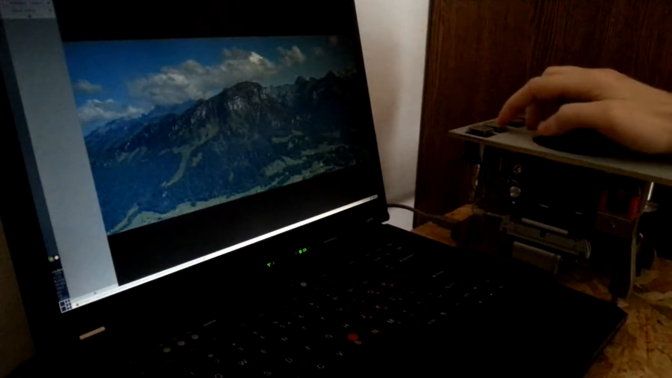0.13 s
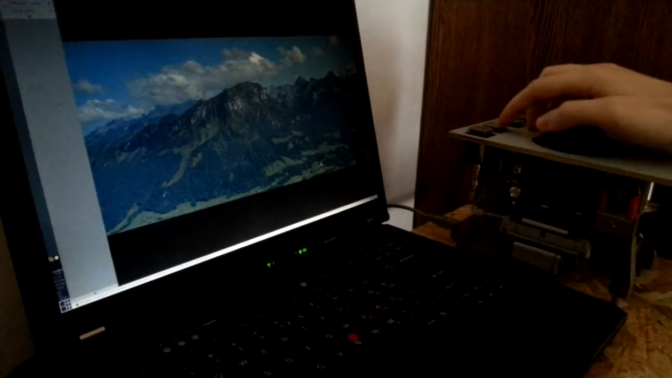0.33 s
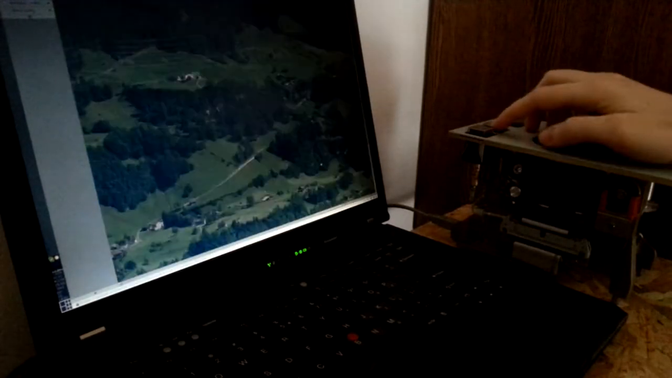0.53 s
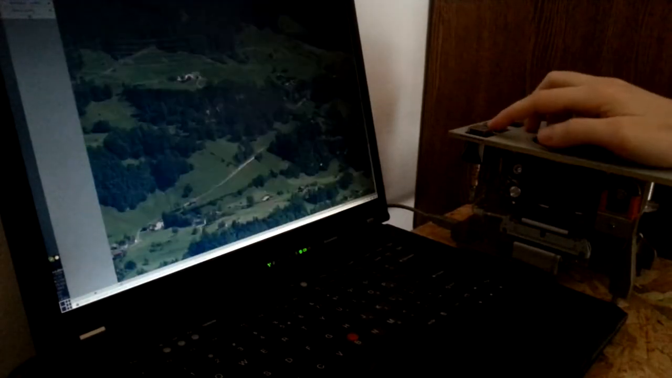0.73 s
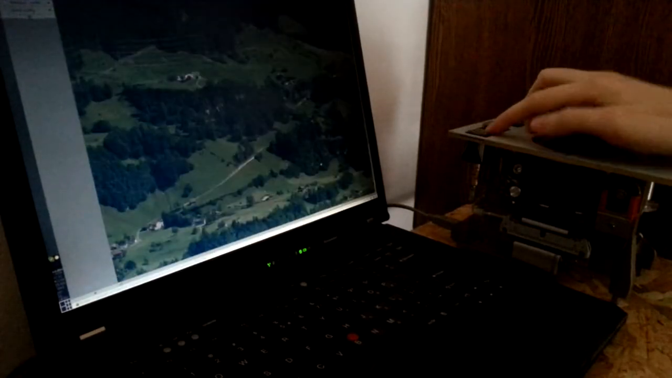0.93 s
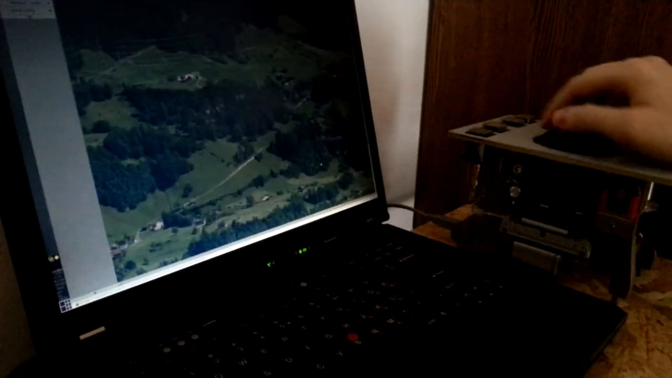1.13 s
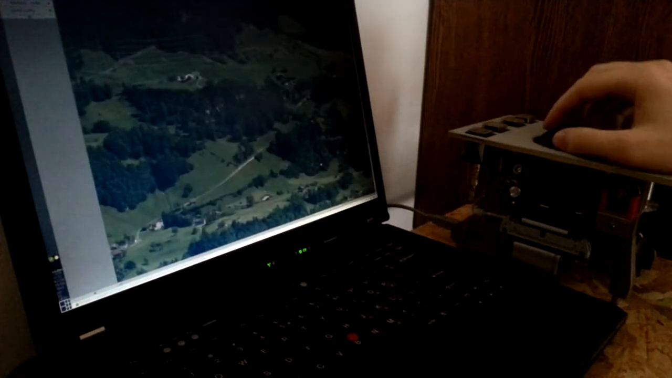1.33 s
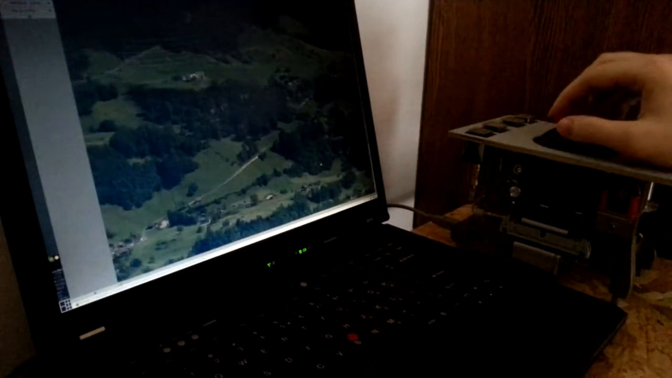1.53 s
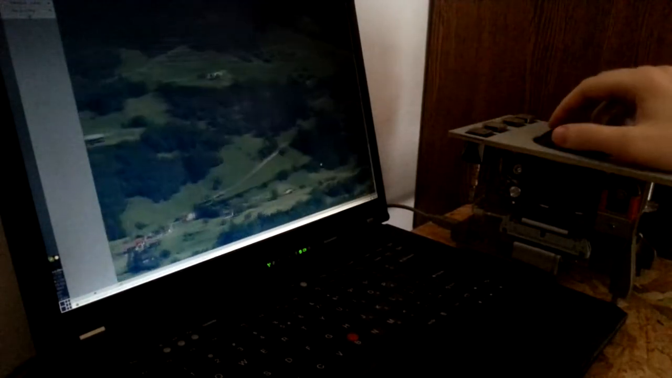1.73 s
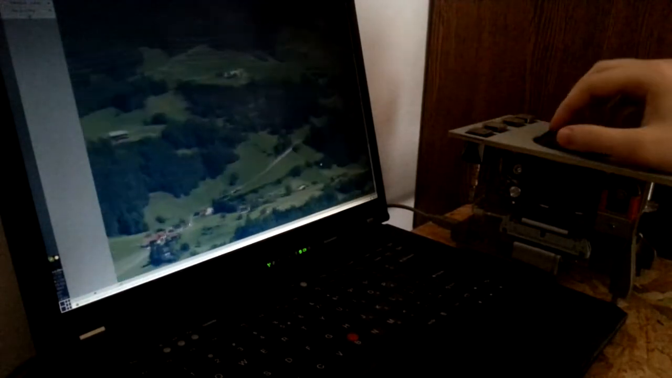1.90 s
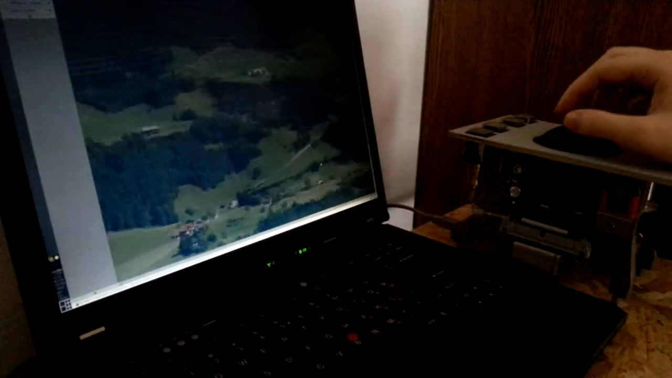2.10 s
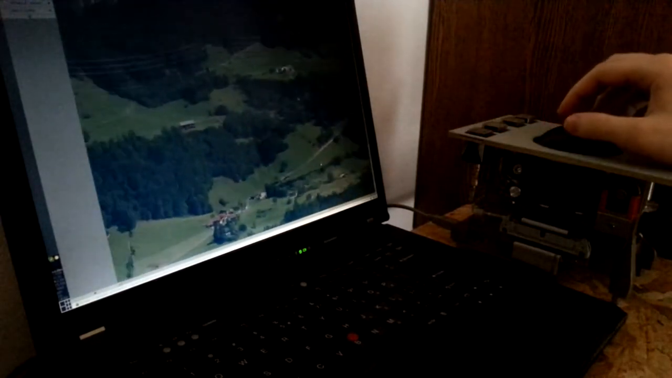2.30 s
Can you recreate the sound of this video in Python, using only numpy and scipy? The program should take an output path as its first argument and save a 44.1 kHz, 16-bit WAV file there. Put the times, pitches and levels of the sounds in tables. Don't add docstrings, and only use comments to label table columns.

```python
import sys
import numpy as np
from scipy import signal
from scipy.fft import rfft, irfft
from scipy.io import wavfile
from scipy.ndimage import uniform_filter1d, map_coordinates

SR = 44100
rng = np.random.default_rng(int(sys.argv[2]) if len(sys.argv) > 2 else 0)


def how_loud(loudness_db):
    steps = np.asarray(loudness_db, float) / 20
    return 10 ** steps


def master(y):
    cut = np.clip(np.atleast_2d(y).T, -1, 1)
    pcm = np.round(cut * 32767)
    wavfile.write(sys.argv[1], SR, pcm.astype(np.int16))


N = 101430

# (frequency [Hz], level when struck [dB], level when rolled [dB], t60 [s])
PANEL_MODES = [(150.4, -14, -0.5, 0.28), (189.9, -5.5, 2, 0.2), (218.6, -11, -6.5, 0.15),
               (311.5, 10, 2, 0.06), (343.7, 10.5, 2, 0.066), (413, 4, -11, 0.1), (463, 3.5, -10, 0.027),
               (478.9, -4.5, -19.5, 0.75), (544, 7, -14, 0.04), (629, 0.5, -32.5, 0.15),
               (678.5, 5, -17.5, 0.057), (818, 11, -51, 0.023), (1232, 0, -14.5, 0.04),
               (1395, 6, -18, 0.074)]


def unit(x):
    return x / np.sqrt(np.mean(x ** 2))


def peak(x):
    return x / np.abs(x).max()


def band(x, hz, width_hz):
    return signal.lfilter(*signal.iirpeak(hz, hz / width_hz, SR), x)


def band_twice(x, hz, width_hz):
    return band(band(x, hz, width_hz), hz, width_hz)


def ring(x, hz, t60):
    pole = np.exp(2j * np.pi * hz / SR - np.log(1000) / (max(t60, 1e-3) * SR))
    return signal.lfilter([1], [1, -pole], x).imag


def panel(force, level_column, split_hz):
    low, high = np.zeros((2, len(force)))
    for k, mode in enumerate(PANEL_MODES):
        hz, t60 = mode[0], mode[3]
        tone = (-1) ** k * how_loud(mode[level_column]) * ring(force, hz, t60)
        if hz < split_hz:
            low += tone
        else:
            high += tone
    return low, high


def walk(rate):
    k = int(SR / rate)
    steps = np.repeat(rng.standard_normal(N // k + 1), k)
    return unit(uniform_filter1d(uniform_filter1d(steps, k), k)[:N])


def hiss():
    # (frequency [Hz], density [dB per Hz])
    floor = [(25, -23), (60, -10), (110, -5.5), (580, -9.5), (830, -11), (1500, -13.5), (5140, -19),
             (15500, -20)]
    # (frequency [Hz], width [Hz], level [dB])
    fan = [(5200, 1060, -54), (7330, 16, -64), (180, 46, -73.5), (507, 73, -59.5)]
    floor_db, alike_below_hz = -47, 370
    f = np.arange(N // 2 + 1) * SR / N + 1
    hz, db = np.array(floor).T
    mid, side = rfft(rng.standard_normal((2, N))) * how_loud(np.interp(np.log(f), np.log(hz), db))
    side = side * f / (f + alike_below_hz)
    out = unit(irfft(np.array([mid + side, mid - side]), N)) * how_loud(floor_db)
    air = rng.standard_normal(N) + 1.8 * rng.standard_normal((2, N))
    for hz, width_hz, db in fan:
        out = out + how_loud(db) * unit(band(air, hz, width_hz))
    return out


def earlier_spin():
    hz, level_db, t60_s = 184.3, -27.5, 0.088
    t = np.arange(N) / SR
    return how_loud(level_db) * np.sin(2 * np.pi * hz * t) * how_loud(-60 * t / t60_s)


def steady(x):
    flywheel_s = 0.17
    return x / np.sqrt(uniform_filter1d(x ** 2, int(flywheel_s * SR)))


def rolling():
    # (time [s], level [dB])
    speed_curve = [(0, -34), (.035, -60), (.05, -57.5), (1.28, -67.5), (1.372, -39), (1.388, -43.5),
                   (1.42, -35), (1.5, -39.5), (1.62, -39.5), (1.655, -43.5), (1.69, -43), (1.86, -55),
                   (1.888, -37), (1.92, -35), (2.07, -31), (2.11, -34), (2.2, -36.5), (2.3, -36.5)]
    bumps_per_s, bump_spread_db = 900, 2
    boom_top_hz, boom_db = 260, 1.5
    grit_hz, grit_width_hz, grit_db = 1370, 1130, -19
    lurch_db, lurch_per_s = -1, 30
    t = np.arange(N) / SR
    chance = rng.random((2, N))
    size = how_loud(-bump_spread_db * np.log(chance[1] + 1e-9))
    bumps = (chance[0] < bumps_per_s / SR) * size * rng.standard_normal(N)
    boom, hum = panel(bumps, 2, boom_top_hz)
    rumble = how_loud(boom_db) * steady(boom) + steady(hum)
    grit = steady(band_twice(bumps, grit_hz, grit_width_hz))
    speed = how_loud(np.interp(t, *np.array(speed_curve).T) + lurch_db * walk(lurch_per_s))
    return speed * (rumble + how_loud(grit_db) * grit)


def skin():
    slip_s = [
        1.27,
        2.268,
        2.225,
    ]
    # (length [s], level [dB])
    slips = [
        (0.019, -44),
        (0.019, -41),
        (0.039, -52.5),
    ]
    t = np.arange(N) / SR
    rub = unit(band_twice(rng.standard_normal(N), 4160, 6300)) * how_loud(3.6 * walk(150))
    swell = np.zeros(N)
    for s, (length, db) in zip(slip_s, slips):
        swell += how_loud(db) * np.exp(-((t - s) / length) ** 2)
    return rub * swell


def rattle(t):
    rise_s, fall_s, even_hz = .0007, .0013, 300
    swell = (1 - np.exp(-t / rise_s)) ** 2 * np.exp(-t / fall_s)
    x = rfft(swell * rng.standard_normal(len(t)))
    even = x / np.sqrt(uniform_filter1d(np.abs(x) ** 2, even_hz // 2))
    return irfft(even) * (t < .1)


def struck(x, modes, centre_hz, octaves):
    longest_ring_s = .024
    out = 0
    for k, (hz, db, t60) in enumerate(modes):
        away = np.log2(hz / centre_hz) / octaves
        out = out + (-1) ** k * how_loud(db - 5.9 * away ** 2) * ring(x, hz, min(t60, longest_ring_s))
    return peak(out)


def springs(t):
    # (frequency [Hz], level [dB], t60 [s])
    spring_modes = [(3040, 5.5, 0.061), (3070, -16, .045), (3080, 3.5, .03), (3360, 10, 0.047),
                    (4090, 10.5, 0.0083), (4480, -0.5, 0.074), (4650, 10.5, 0.031), (4900, 4.5, 0.029),
                    (5550, 9, 0.016), (5730, -13, 0.027), (6100, 9.5, 0.04), (6180, -26, 0.029),
                    (7200, -2, 0.027), (7870, 8, 0.035)]
    # (time [s], level [dB], centre [Hz], crack re
    # ring [dB])
    snaps = [(0.202, -30, 5000, -18), (0.2115, -19, 6300, 10), (0.2175, -12, 7000, 24),
             (0.2196, 0.5, 3540, 12), (0.2226, 4.5, 3900, 9), (0.23, -3.5, 4550, -12),
             (0.3527, -5.5, 4460, 8), (0.361, -14, 4350, -16), (0.819, -27, 4500, -18),
             (0.8358, -17.5, 3200, -5), (0.856, -10, 5200, -7), (0.8644, -2, 4900, 11),
             (.868, 1.5, 4900, 1.5), (0.872, -11, 4050, -21), (0.9971, -3, 3540, -10),
             (0.9991, -2, 6100, -1.5), (1.0033, -10.5, 3260, -26), (1.003, -14.5, 4640, -26),
             (1.416, -39.5, 3000, -11)]
    octaves, body_width_hz, body_db = 0.51, 1500, -3
    out = np.zeros(N + len(t))
    for s, db, hz, crack_db in snaps:
        chatter = rattle(t)
        body = band_twice(chatter, hz, body_width_hz)
        crack = band_twice(chatter, 7000, 7500)
        snap = struck(chatter, spring_modes, hz, octaves)
        snap = snap + how_loud(body_db) * peak(body) + how_loud(crack_db) * peak(crack)
        out[int(s * SR):][:len(t)] += how_loud(db) * peak(snap)
    return out[:N]


def stops(t):
    # (frequency [Hz], level [dB], t60 [s])
    cap_modes = [(823, -3, .03), (942, -4, 0.029), (1126, -1.5, 0.036), (1297, 0, 0.051), (1520, 1, 0.019),
                 (1834, 1, 0.013), (2000, -1, 0.028), (2230, 2, 0.046), (2300, 0.5, 0.055), (2404, 5, 0.01)]
    # (time [s], panel thump
    # [dB], cap knock [dB], knock centre [Hz])
    clicks = [(.204, -35.5, -25.5, 2000), (0.2194, -36, -5.5, 2183), (0.2228, -17, -7.5, 1200),
              (0.228, -24.5, -9, 1650), (0.3515, -24.5, -7, 1750), (.359, -18, -9, 1310),
              (.816, -50, -27.5, 1460), (0.8355, -20, -11, 955), (.857, -27.5, -19, 1510),
              (0.8661, -18.5, -13, 1500), (.874, -27, -11.5, 2600), (0.956, -27, -28, 920),
              (.9975, -27, -11.5, 2300), (1.0032, -21, -13.5, 2270), (1.218, -41, -60, 910),
              (1.411, -33, -62, 1400), (1.449, -38.5, -56, 1400), (1.645, -34.5, -58, 1400)]
    push_s, upper_panel_hz, upper_panel_db, knock_octaves = 0.0012, 580, -8, 0.61
    push = np.diff(t * np.exp(-t / push_s), prepend=0)
    low, high = panel(push, 1, upper_panel_hz)
    low, high = peak(low), peak(high)
    out = np.zeros(N + len(t))
    for s, thump_db, knock_db, knock_hz in clicks:
        knock = struck(rattle(t), cap_modes, knock_hz, knock_octaves) + how_loud(upper_panel_db) * high
        out[int(s * SR):][:len(t)] += 2 * how_loud(thump_db) * low + how_loud(knock_db) * knock
    return out[:N]


def buttons():
    t = np.arange(SR // 2) / SR
    return springs(t) + stops(t)


def room(x):
    # (band centre [Hz], t60 [s], level [dB])
    decay = [(185, 0.49, -11.5), (516, 0.34, -15), (1150, 0.23, -8), (2920, 0.18, -13.5),
             (5400, 0.44, -14.5), (10800, 0.067, -10)]
    start_s, build_up_s, even_hz = .005, .008, 120
    t = np.arange(SR // 2) / SR
    noise = rng.standard_normal((2, len(t)))
    noise[1] = 1.1 * noise[1] + 0.32 * noise[0]
    build_up = 1 - np.exp(-np.maximum(t - start_s, 0) / build_up_s)
    tail = 0
    for hz, t60, db in decay:
        echo = rfft(noise * np.exp(-np.log(1000) * t / t60) * build_up)
        echo = echo / np.sqrt(uniform_filter1d(np.abs(echo) ** 2, even_hz // 2))
        tail = tail + how_loud(db) * band(irfft(echo), hz, hz)
    return signal.fftconvolve(x[None], tail, axes=1)[:, :N]


def ahead(x, lead_s):
    return map_coordinates(x, [np.arange(N) + lead_s * SR], mode="nearest")


def scene():
    left_db, bass_lead_s, treble_lead_s, split_hz = -1.5, 0.00022, .00004, 1500
    mic = signal.butter(2, [135, 11900], "band", fs=SR, output="sos")
    device = signal.sosfilt(mic, rolling() + skin() + buttons()) + earlier_spin()
    bass = signal.sosfiltfilt(signal.butter(2, split_hz, fs=SR, output="sos"), device)
    left = how_loud(left_db) * (ahead(bass, bass_lead_s) + ahead(device - bass, treble_lead_s))
    return np.array([left, device]) + room(device) * how_loud(np.array([[left_db], [0]])) + hiss()


def roll_off(x):
    return signal.sosfilt(signal.butter(12, 15770, fs=SR, output="sos"), x)


def record(dry):
    return roll_off(np.clip(dry, -1, 1))


dry = scene()
out = record(dry)
master(out)
```